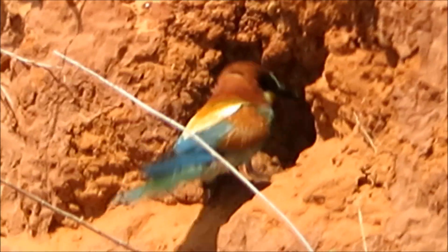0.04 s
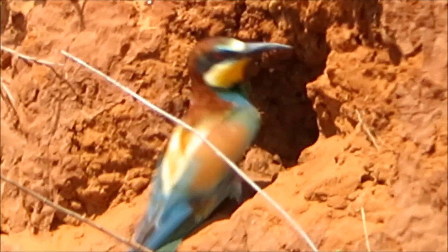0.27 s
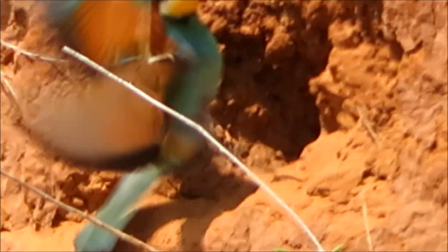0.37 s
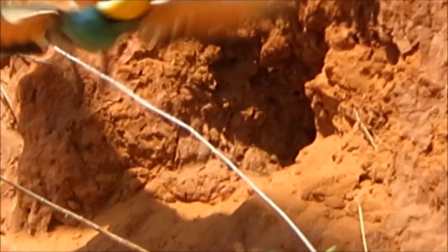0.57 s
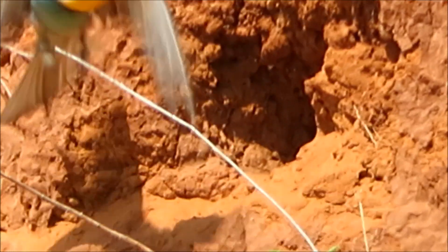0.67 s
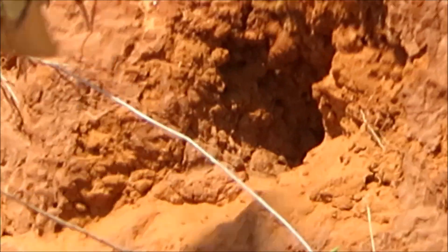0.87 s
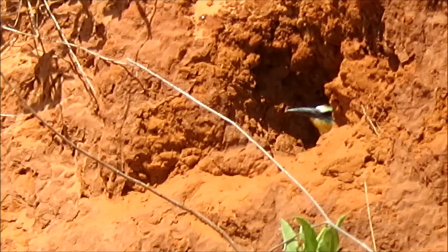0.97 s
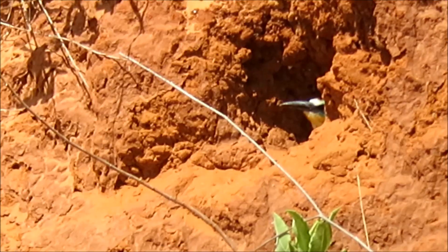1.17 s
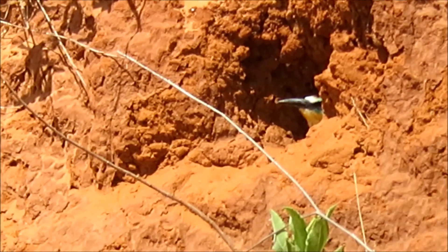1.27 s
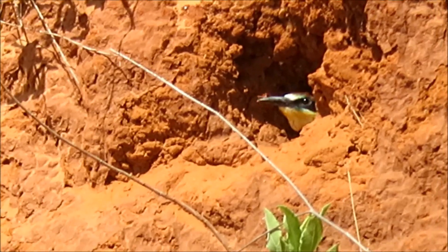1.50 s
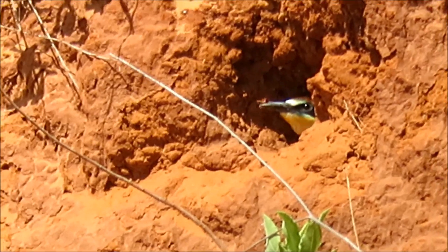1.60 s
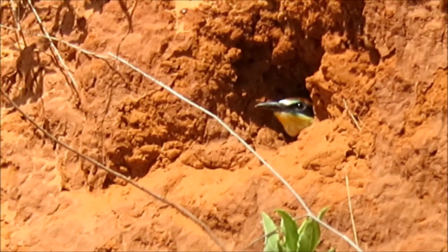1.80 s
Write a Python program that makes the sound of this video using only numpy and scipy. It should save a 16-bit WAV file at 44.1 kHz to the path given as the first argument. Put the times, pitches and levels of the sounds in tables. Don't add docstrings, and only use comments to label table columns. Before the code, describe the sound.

Wind buffets a bare stereo microphone outdoors: soft low puffs at first, then dense thumps, flutter and crackle from about 0.65 to 1.4 seconds, easing away by 1.85. Distant traffic hum and wide hiss continue underneath. Tiny high chirps dot the first 0.55 seconds. A rolling bee-eater whistle sounds faintly at 0.85-0.95, then clearer short rising ones at 1.55, 1.65 and 1.8, lightly echoing off the bank.

```python
import sys
import numpy as np
from scipy import signal
from scipy.fft import rfft, irfft
from scipy.io import wavfile
from scipy.ndimage import uniform_filter1d

SR = 44100
rng = np.random.default_rng(int(sys.argv[2]) if len(sys.argv) > 2 else 0)


def wav_record(signal):
    frames = np.transpose(np.atleast_2d(signal))
    bounded = np.clip(frames, -1, 1)
    quanta = np.round(bounded * 32767).astype(np.int16)
    wavfile.write(sys.argv[1], SR, quanta)


def voltage_ratio(level):
    return 10 ** (np.asarray(level, float) / 20)


N = 81585
T = np.arange(N) / SR

# (time [s], level [dB])
GUST = [(0, -39), (.1, -40.5), (.2, -39), (.3, -38), (.39, -40.5), (.42, -35.5), (.6, -35.5), (.7, -32.5),
        (.77, -26.5), (.85, -36), (.93, -27.5), (1.0, -29.5), (1.075, -27), (1.15, -32), (1.392, -34),
        (1.4, -41), (1.6, -37.5), (1.85, -48)]
# (time [s], peak [dB], pitch [Hz], push or pull
EDDIES = [(0.0175, -26.1, 263, -1), (0.0613, -26.0, 286, 1), (0.2308, -20.2, 253, -1),
          (0.3258, -27.7, 234, 1), (0.4089, -21.6, 221, -1), (0.429, -23.1, 209, -1),
          (0.5177, -21.7, 258, 1), (0.5756, -22.9, 186, -1), (0.6301, -20.6, 372, 1),
          (0.7484, -8.2, 275, 1), (0.8056, -13.4, 229, 1), (0.8761, -16.4, 286, -1),
          (0.9095, -14.9, 329, 1), (0.962, -15.3, 315, 1), (1.0585, -10.5, 400, 1),
          (1.0785, -13.5, 300, -1), (1.1254, -10.6, 225, 1), (1.1405, -15.7, 268, -1),
          (1.188, -18.7, 256, 1), (1.2351, -12.9, 201, -1), (1.2697, -17.0, 239, -1),
          (1.3075, -17.3, 226, -1), (1.3523, -21.9, 184, 1), (1.391, -19.1, 192, -1),
          (1.5084, -25.0, 288, 1), (1.5347, -26.8, 270, 1), (1.6155, -28.4, 196, -1),
          (1.6974, -30.8, 291, -1), (1.8458, -34.0, 180, 1),
          (0.6628, -25.1, 158, -1), (0.6748, -21.9, 262, -1), (0.6871, -17.7, 286, -1),
          (0.7043, -18.0, 334, 1), (0.7243, -18.5, 368, 1), (0.7363, -16.0, 167, -1),
          (0.7631, -16.2, 283, 1), (0.7737, -20.1, 253, -1), (0.7831, -22.7, 324, -1),
          (0.8198, -15.9, 240, 1), (0.8302, -20.9, 188, 1), (0.8452, -21.7, 294, 1),
          (0.889, -18.2, 272, -1), (0.9217, -19.5, 294, -1), (0.9331, -15.2, 441, -1),
          (0.949, -17.2, 350, -1), (0.9795, -19.2, 286, 1), (0.995, -18.6, 256, -1),
          (1.0084, -21.4, 175, -1), (1.0216, -19.1, 315, -1), (1.0358, -17.9, 259, 1),
          (1.049, -16.4, 214, -1), (1.0688, -11.0, 306, -1), (1.101, -18.3, 259, 1), (1.111, -21.1, 235, 1),
          (1.2154, -24.2, 266, -1), (1.2524, -21.9, 279, 1), (1.3212, -22.8, 210, 1),
          (1.3327, -20.6, 232, -1), (1.378, -21.7, 204, -1)]
# (time [s], peak [dB], pitch [Hz])
FLUTTERS = [(.226, -38.5, 405), (.401, -30.5, 486), (.43, -38, 550), (.522, -32.5, 430), (.629, -24.5, 435),
            (.69, -42.5, 820), (.803, -37, 790), (.878, -33, 560), (.907, -33.5, 780), (.934, -36, 765),
            (.963, -29, 740), (1.005, -30.5, 725), (1.14, -45, 1000), (.702, -30, 500), (.724, -27.5, 480),
            (.735, -39, 780), (.76, -32, 676), (.745, -36, 764), (.768, -41, 1150), (0.789, -40.5, 900),
            (0.811, -23.5, 470), (.909, -17.5, 480), (0.937, -27, 500), (.962, -26.5, 560),
            (1.051, -23.5, 614), (1.063, -16, 460), (1.078, -27, 820), (1.081, -35.5, 1150),
            (1.137, -27, 520), (1.192, -29.5, 500), (1.235, -35, 560), (1.309, -33, 640), (1.342, -32, 560)]
# (frequency [Hz], density [dB per Hz])
BUFFET_COLOUR = [(25, -32.5), (60, -12), (150, 5), (260, -1), (430, -0.5), (600, -27.5), (1000, -45),
                 (3000, -100)]
# (frequency [Hz], density [dB per Hz])
CRACKLE_COLOUR = [(250, -5), (450, -5), (650, -4), (900, -15), (1300, -27), (3000, -81)]
# (frequency [Hz], level [dB])
PORT_DIFFERENCE = [(60, -72), (140, -55.5), (210, -42.5), (320, -29), (490, -20.5), (740, -11.5),
                   (1500, -12)]
# (frequency [Hz], density [dB per Hz])
RASP_COLOUR = [(700, -16.5), (1500, -0.5), (2500, -14), (4000, -20.5), (8000, -28), (14000, -54.5)]
# (frequency [Hz], density [dB per Hz])
TRAFFIC_COLOUR = [(60, -21.5), (400, -2.5), (1000, -1), (1500, -4.5), (2300, -13), (3700, -16.5),
                  (8000, -29), (15000, -41.5)]
# (time [s], level [dB])
TRAFFIC_SWELL = [(0, -2.5), (.19, -1.5), (.22, 2.5), (.58, 3.5), (.62, 2.5), (1.4, 2.5), (1.65, 4.5),
                 (1.85, 4.5)]
# (frequency [Hz], density [dB per Hz])
HISS_COLOUR = [(500, -54), (1500, -33), (2500, 0.5), (4000, 1), (6000, -1), (9000, -6.5), (12000, -8.5),
               (15500, -25)]
# (middle [s], length [s], level [dB], pitch [Hz], slide [share of pitch])
CHIRPS = [(0.065, 0.014, -58, 5420, -0.017), (0.083, .006, -68, 7100, -.02), (0.102, .008, -70, 7000, .02),
          (.14, .02, -67, 4450, .001), (.168, 0.014, -55, 6130, 0.012), (0.214, .02, -61, 3830, 0.031),
          (0.243, 0.02, -63, 3630, -0.022), (0.368, 0.01, -76, 5520, .001), (0.383, .008, -58, 5480, -.01),
          (.405, 0.019, -55, 5400, -0.018), (0.44, .02, -70, 7000, 0.02), (0.49, .014, -62, 4380, -0.0029),
          (.517, 0.017, -54, 6050, .015), (0.55, 0.027, -73, 3740, -.01), (1.653, .008, -63, 5200, 0.0057),
          (1.709, 0.012, -61, 6000, .001)]
# (start [s], length [s], level [dB], pitch [Hz])
TWITTER = [
    (.77, .08, -70, 3750),
    (.9, .3, -73, 3650),
    (1.64, .09, -65, 3850),
    (1.71, .14, -68, 3450),
]
# (time [s], pitch [Hz], level [dB])
WHISTLES = [
    [(.8, 1470, -61), (.818, 1604, -63), (.836, 1716, -47), (.856, 1800, -44), (.878, 1813, -39.5),
     (.902, 1760, -42), (.916, 1706, -54), (.927, 1767, -36.5), (.945, 1780, -61)],
    [(1.531, 1550, -60), (1.537, 1550, -49), (1.543, 1780, -55), (1.553, 1827, -36), (1.57, 1882, -34),
     (1.578, 1992, -40), (1.585, 2177, -37.5), (1.592, 2170, -73)],
    [(1.618, 1500, -99), (1.625, 1607, -45), (1.632, 1790, -54), (1.645, 1827, -33.5), (1.653, 2000, -38.5),
     (1.659, 1910, -51), (1.664, 1840, -34), (1.673, 2040, -67)],
    [(1.782, 1958, -64), (1.794, 2003, -49.5), (1.812, 2053, -38.5), (1.821, 1983, -48), (1.829, 2050, -38),
     (1.839, 1950, -62), (1.846, 1960, -36), (1.85, 1970, -47)],
]
# (time [s], height [Hz], stretch [ratio])
FLIPS = [
    (0.845, 524, 1.36),
    (0.8718, 421, 1.15),
    (0.888, 299, 1.27),
    (0.9216, 336, 1.2),
    (1.8133, 506, 1.3),
    (1.842, 486, 1.8),
]
# (delay [s], level [dB], left over right [dB])
BANK_ECHOES = [
    (.0062, -12, 2),
    (.0185, -18, -2),
    (.0295, -14, 2),
]

BRIGHT_DB, CALM_DB, BRIGHT_HZ = 0.93, -22.5, 315.6
LUMP_S, LUMP_SHARE = 0.0086, 0.22
EDDY_CYCLES, FLUTTER_CYCLES = .38, 1.11
CRACKLE_DB, CRACKLE_SLOPE = -17, 0.71
RASP_DB, UNLIKE_SLOPE = -42, 0.44
WIND_BASS_HZ = 42.7
TICK_S, TICK_DB = .7358, -27.5
TRAFFIC_DB, HISS_DB = -53.5, -67.5
STEADY_HZ, AIR_DB = 5000, 1.5
CHIRP_LEFT_DB = -5.5
FLIP_RISE_S, FLIP_FALL_S, FLIP_DIP, OVERTONE_DB = .0026, .0036, .45, -36
BLUR_DB, BLUR_T60 = -13, .11


def evened(x):
    return x / np.sqrt(np.mean(x ** 2) + 1e-20)


def smooth_twice(x, first, second):
    return uniform_filter1d(uniform_filter1d(x, first, 0), second, 1)


def read(points, hz):
    f, value = np.transpose(points)
    return np.interp(np.log(hz + 1), np.log(f + 1), value)


def noise(colour, patch_db, flicker_db, tilt=0., size=512):
    hop = size // 4
    frames, hz = N // hop + 5, np.fft.rfftfreq(size, 1 / SR)
    real, imag, rough = rng.standard_normal((frames, len(hz), 3)).T
    patch = evened(smooth_twice(rough, 5, 8))
    flicker = evened(uniform_filter1d(rng.standard_normal(frames), 5))
    bright = np.interp(np.arange(frames) * hop, np.arange(N), tilt * np.ones(N))
    octaves = np.clip(np.log2((hz + 1) / BRIGHT_HZ), 0, 2)[:, None]
    db = read(colour, hz)[:, None] + patch_db * patch + flicker_db * flicker + octaves * bright
    z = (real + 1j * imag) * voltage_ratio(db) * (hz > 0)[:, None]
    z = z / np.sqrt((voltage_ratio(db) ** 2).mean(0)) * voltage_ratio(flicker_db * flicker)
    return evened(signal.istft(z, nperseg=size, noverlap=size - hop)[1][:N])


def wind():
    gust_db = np.interp(T, *np.transpose(GUST))
    lumps, pulses, clear = voltage_ratio(gust_db), np.zeros(N), np.ones(N)
    for s, db, hz, sign in EDDIES:
        lumps = lumps + LUMP_SHARE * voltage_ratio(db) * np.exp(-((T - s) / LUMP_S) ** 2)
        turn = (T - s) * hz
        clear *= 1 - .8 * np.exp(-turn ** 2)
        pulses += sign * voltage_ratio(db) * np.exp(-(turn / EDDY_CYCLES) ** 2 / 2) * np.cos(2 * np.pi * turn)
    for s, db, hz in FLUTTERS:
        turn = (T - s) * hz
        flutter = np.cos(2 * np.pi * (turn + rng.random()))
        pulses += voltage_ratio(db) * np.exp(-(turn / FLUTTER_CYCLES) ** 2 / 2) * flutter

    tilt = BRIGHT_DB * (gust_db - CALM_DB)
    strength = lumps / voltage_ratio(-28)
    unlike = strength ** UNLIKE_SLOPE
    crackle = voltage_ratio(CRACKLE_DB) * lumps * strength ** CRACKLE_SLOPE
    buffeting = lumps * noise(BUFFET_COLOUR, 1.73, 1.7, tilt)
    buffeting += crackle * noise(CRACKLE_COLOUR, 1.8, 1.7, size=256)
    mid = clear * buffeting + pulses
    mid = signal.filtfilt(*signal.butter(2, WIND_BASS_HZ, 'high', fs=SR), mid)

    other = lumps * noise(BUFFET_COLOUR, 3, 2.5, tilt)
    other += crackle * noise(CRACKLE_COLOUR, 2.2, 4.2, size=256)
    ends = np.clip(np.minimum(T, T[::-1]) / .01, 0, 1)
    share = voltage_ratio(read(PORT_DIFFERENCE, np.fft.rfftfreq(N, 1 / SR)))
    side = irfft(rfft(other * unlike * ends) * share, N)
    side += voltage_ratio(RASP_DB) * lumps * unlike * noise(RASP_COLOUR, 2, 2.7, size=256)

    u = (T - TICK_S) * 2500
    tick = voltage_ratio(TICK_DB) * np.exp(-(2 * u) ** 2) * np.sin(2 * np.pi * u)
    return np.array([mid + side + 0.49 * tick, mid - side])


def distance():
    swell_db = np.interp(T, *np.transpose(TRAFFIC_SWELL))
    far = voltage_ratio(TRAFFIC_DB) * noise(TRAFFIC_COLOUR, 1.54, 0.51)
    side = voltage_ratio(HISS_DB) * noise(HISS_COLOUR, 0.77, .6)
    hum = signal.filtfilt(*signal.butter(1, STEADY_HZ, fs=SR), far)
    mid = voltage_ratio(swell_db) * hum + voltage_ratio(AIR_DB) * (far - hum)
    return np.array([mid + side, mid - side])


def small_birds():
    chirps, twitter = np.zeros(N), np.zeros(N)
    for s, length, db, hz, slide in CHIRPS:
        u = (T - s) / length
        turn = 2 * np.pi * hz * length * (u + slide * u ** 2 / 2)
        chirps += voltage_ratio(db) * np.exp(-4 * u ** 2) * np.sin(turn)
    rough = rng.standard_normal((2, N))
    waver = evened(uniform_filter1d(uniform_filter1d(rough, 90, 1), 90, 1))
    for s, length, db, hz in TWITTER:
        shape = np.sin(np.pi * np.clip((T - s) / length, 0, 1)) ** .5
        turn = 2 * np.pi * np.cumsum(hz + 150 * waver[1]) / SR
        twitter += voltage_ratio(db) * shape * waver[0] * np.sin(turn)
    pan = voltage_ratio(np.array([[CHIRP_LEFT_DB], [-CHIRP_LEFT_DB]]) / 2)
    spaced = np.array([chirps, np.roll(chirps, 2)])
    return spaced * pan + twitter * voltage_ratio(np.array([[1.], [-2.5]]))


def bee_eaters():
    lift, dip, dry = np.zeros(N), np.ones(N), np.zeros(N)
    for s, height_hz, stretch in FLIPS:
        u = np.maximum(T - s, 0) / stretch
        shape = (1 - np.exp(-u / FLIP_RISE_S)) ** 2 * np.exp(-(u / FLIP_FALL_S / 2) ** 2)
        lift += height_hz * shape / shape.max()
        dip *= 1 - FLIP_DIP * np.exp(-((T - s) / FLIP_RISE_S - 1) ** 2)
    for call in WHISTLES:
        s, hz, db = np.transpose(call)
        pitch = uniform_filter1d(np.interp(T, s, hz), 90) + lift
        turn = 2 * np.pi * np.cumsum(pitch) / SR
        after_db = db[-1] if s[-1] > T[-1] - .002 else -120
        level = uniform_filter1d(voltage_ratio(np.interp(T, s, db, -120, after_db)), 60)
        dry += np.sqrt(2) * dip * level * (np.sin(turn) + voltage_ratio(OVERTONE_DB) * np.sin(2 * turn))

    scatter = rng.standard_normal((3, 6000)) * voltage_ratio(-60 * T[:6000] / BLUR_T60)
    scatter = scatter[0] + .3 * scatter[1:]
    scatter = scatter / np.linalg.norm(scatter[0])
    out = dry + voltage_ratio(BLUR_DB) * signal.fftconvolve(dry[None], scatter, axes=1)[:, :N]
    for delay, db, pan_db in BANK_ECHOES:
        pan = np.array([[pan_db], [-pan_db]]) / 2
        out += np.roll(dry, round(delay * SR)) * (T > delay) * voltage_ratio(db + pan)
    return out


def scene():
    return wind() + distance() + small_birds() + bee_eaters()


def roll_off(x):
    return signal.sosfilt(signal.butter(12, 15680, fs=SR, output="sos"), x)


def record(dry):
    return roll_off(dry)


dry = scene()
out = record(dry)
wav_record(out)
```